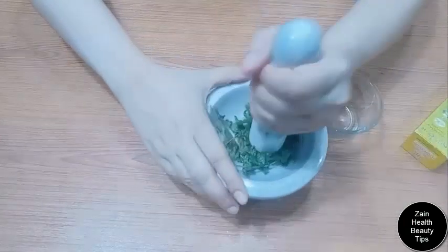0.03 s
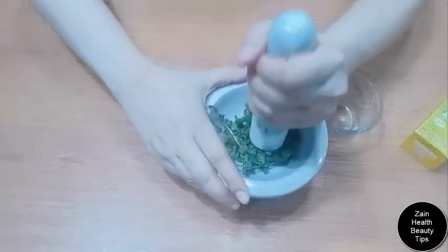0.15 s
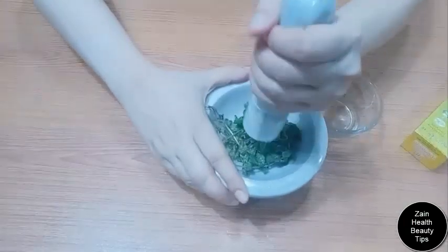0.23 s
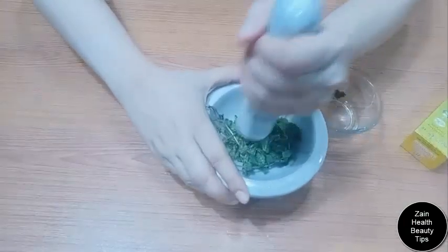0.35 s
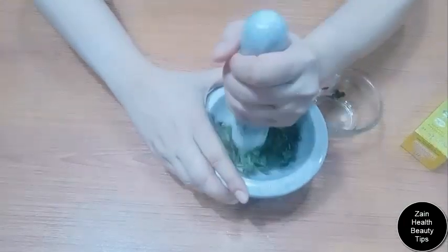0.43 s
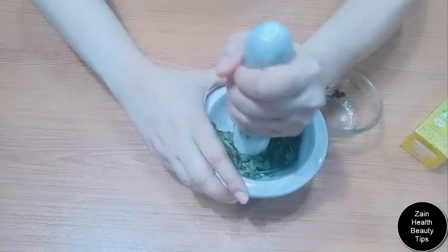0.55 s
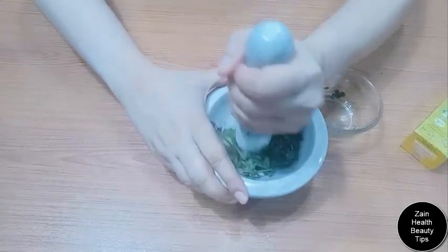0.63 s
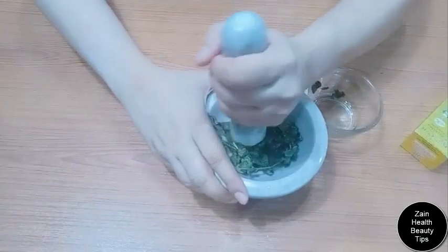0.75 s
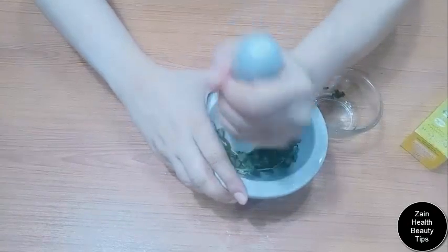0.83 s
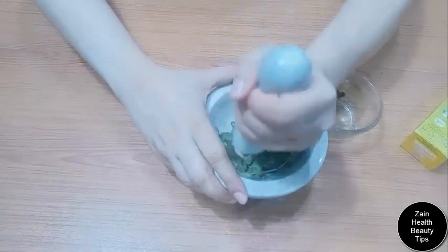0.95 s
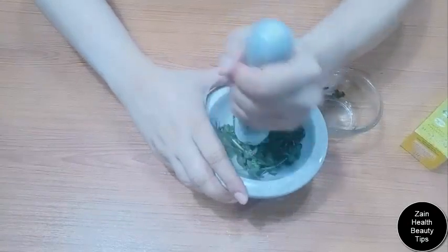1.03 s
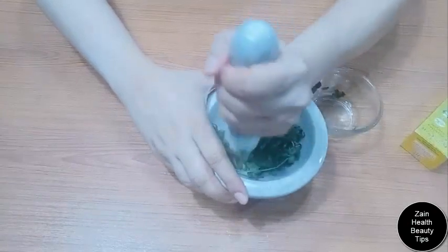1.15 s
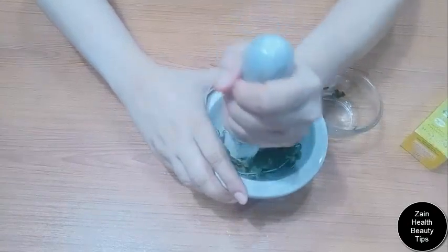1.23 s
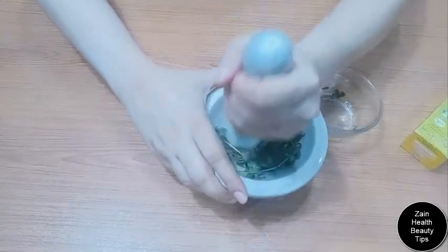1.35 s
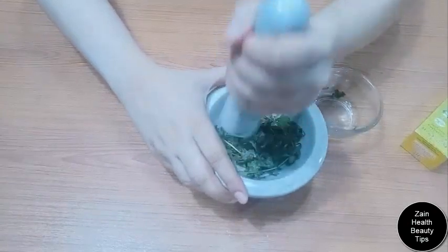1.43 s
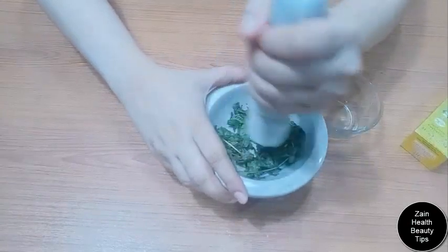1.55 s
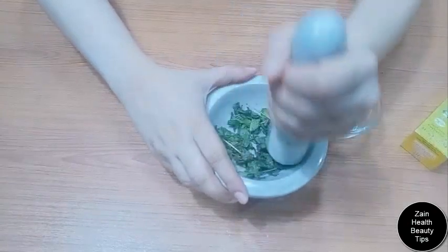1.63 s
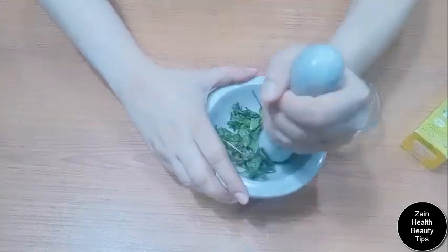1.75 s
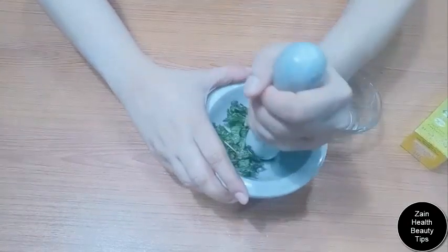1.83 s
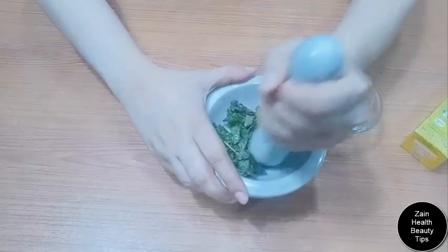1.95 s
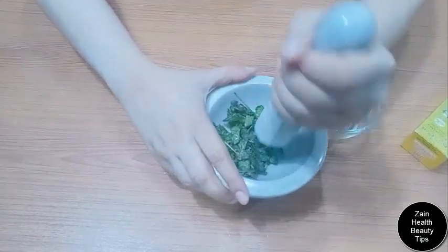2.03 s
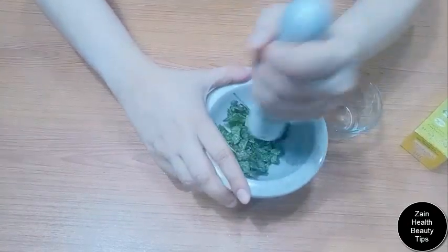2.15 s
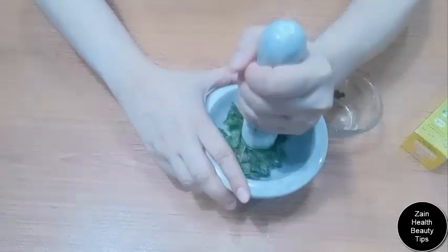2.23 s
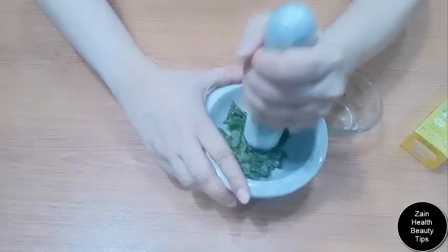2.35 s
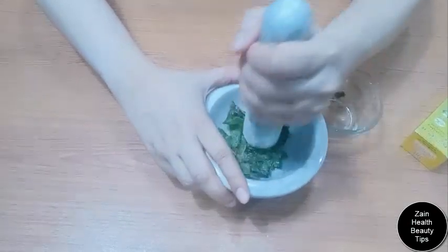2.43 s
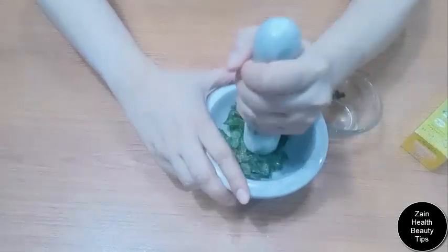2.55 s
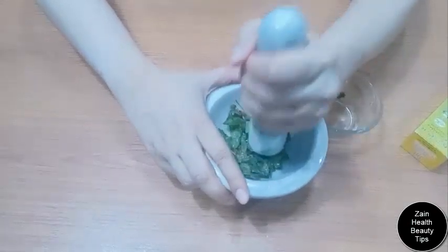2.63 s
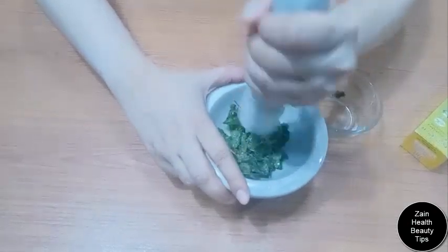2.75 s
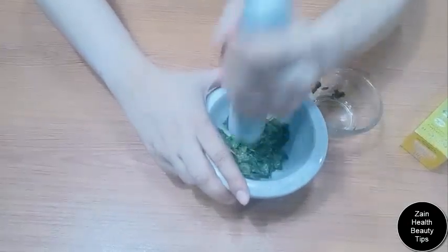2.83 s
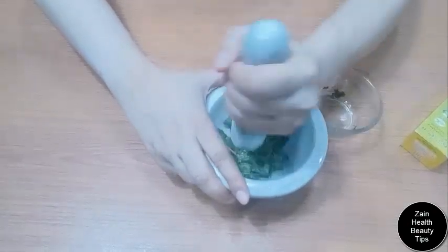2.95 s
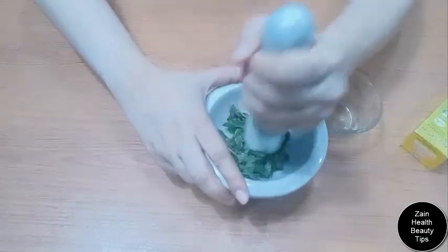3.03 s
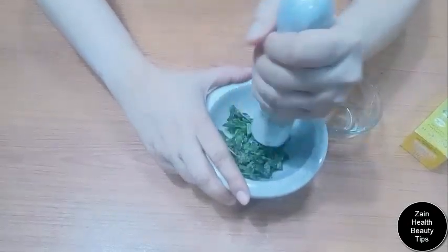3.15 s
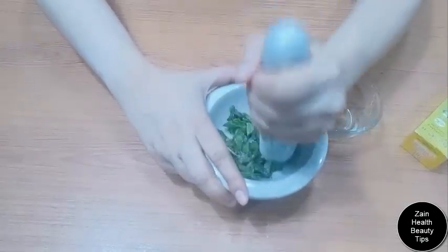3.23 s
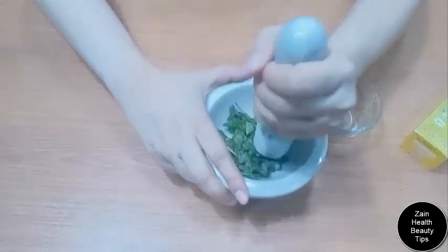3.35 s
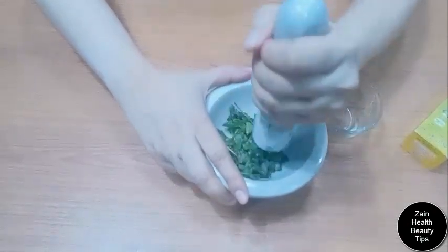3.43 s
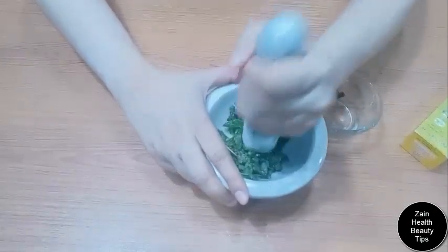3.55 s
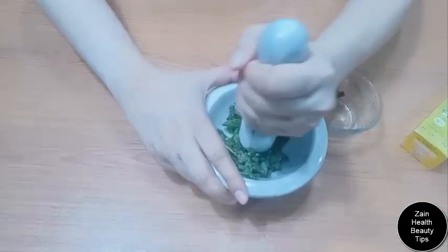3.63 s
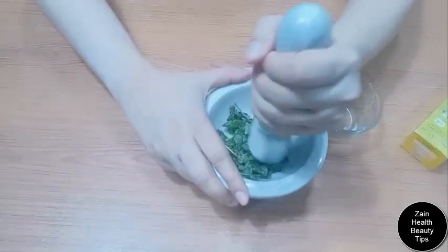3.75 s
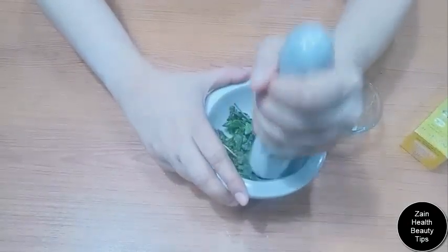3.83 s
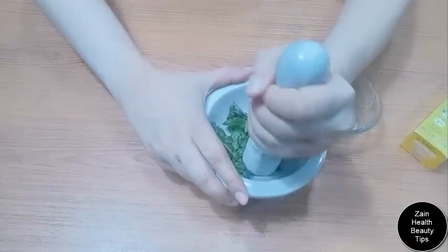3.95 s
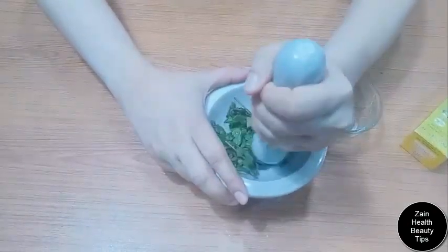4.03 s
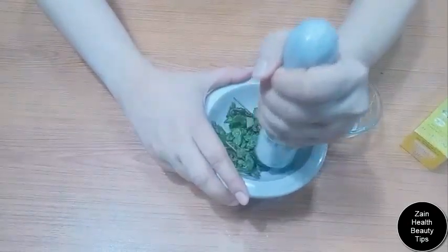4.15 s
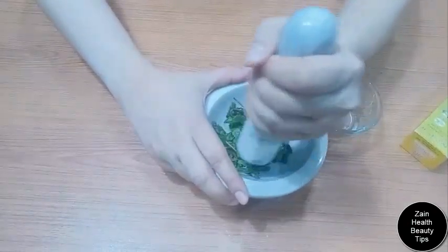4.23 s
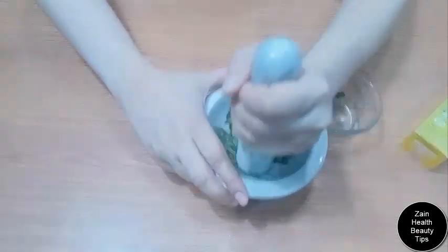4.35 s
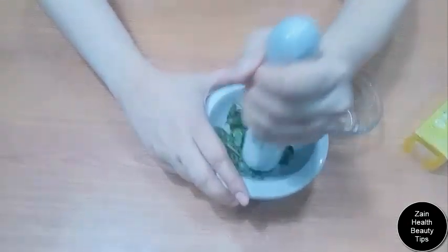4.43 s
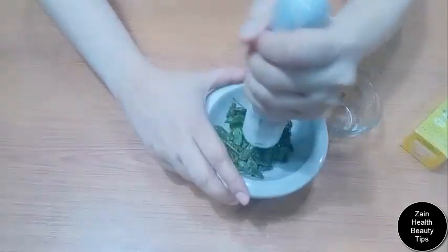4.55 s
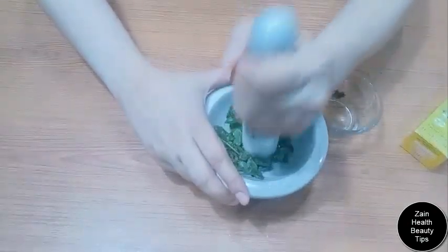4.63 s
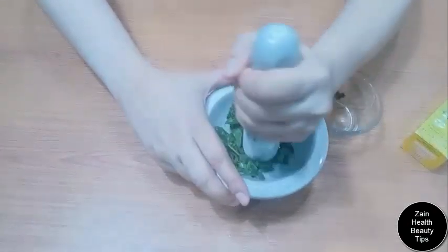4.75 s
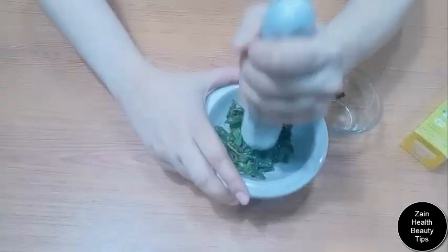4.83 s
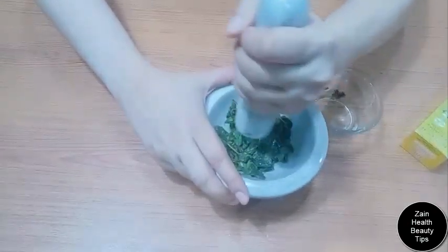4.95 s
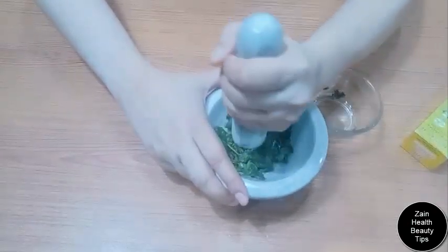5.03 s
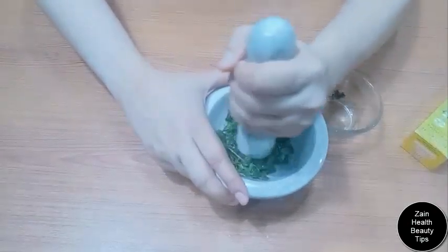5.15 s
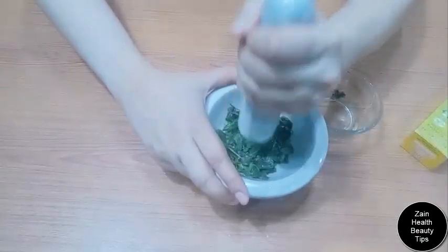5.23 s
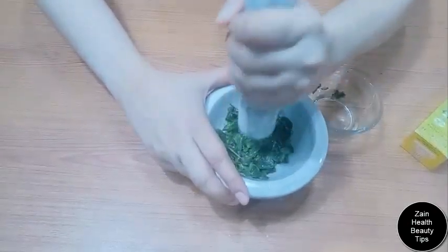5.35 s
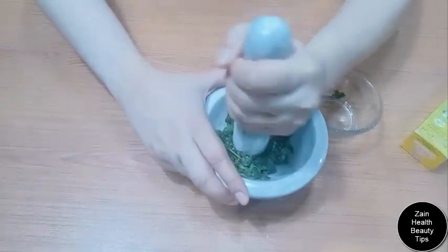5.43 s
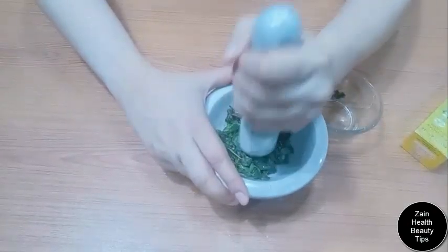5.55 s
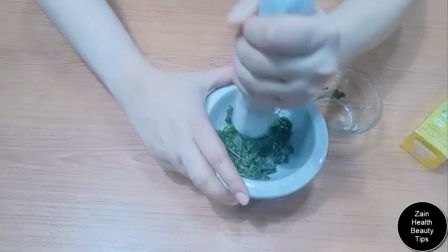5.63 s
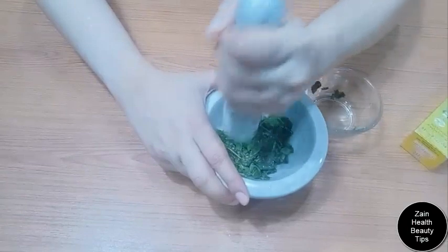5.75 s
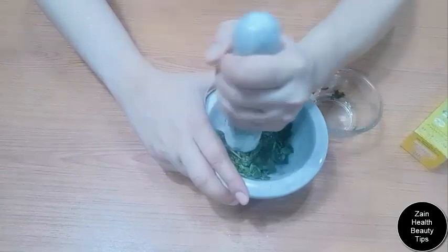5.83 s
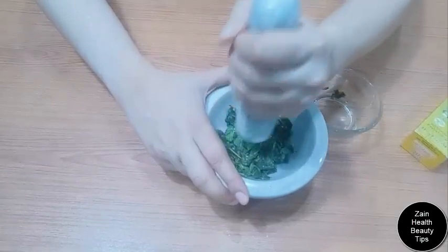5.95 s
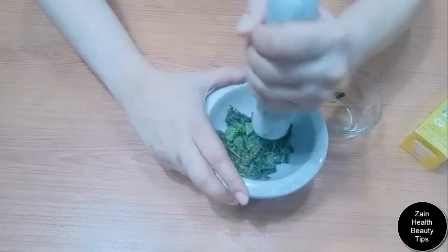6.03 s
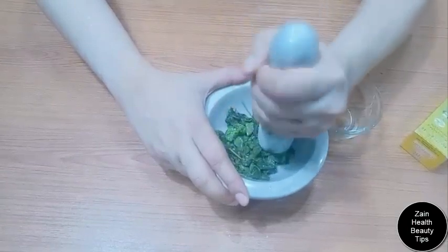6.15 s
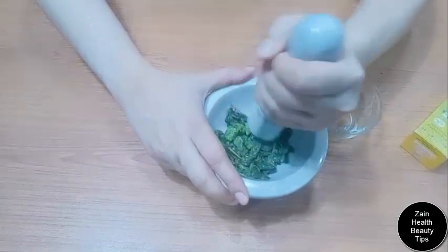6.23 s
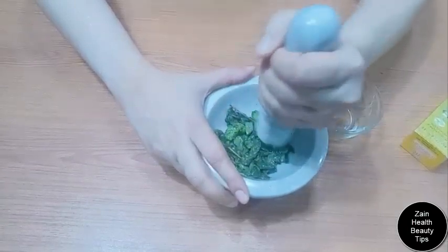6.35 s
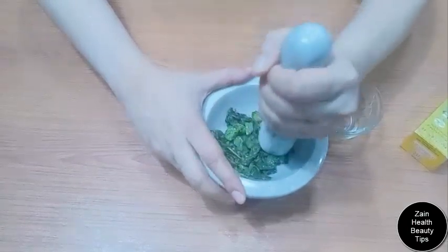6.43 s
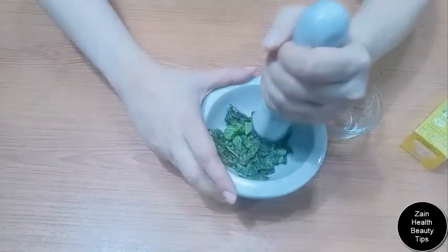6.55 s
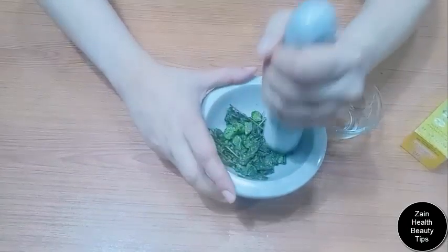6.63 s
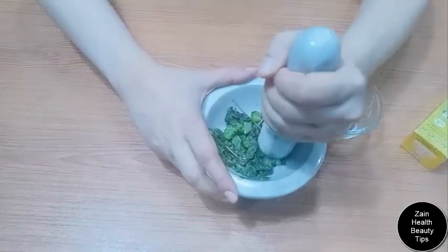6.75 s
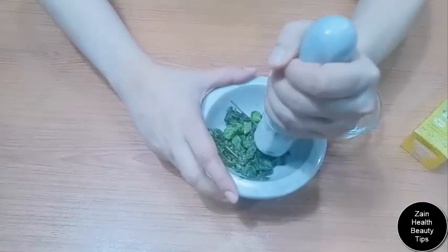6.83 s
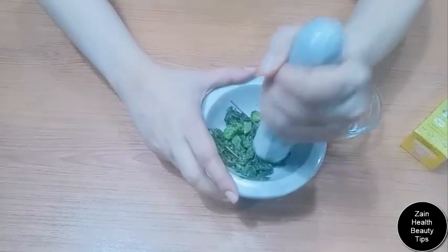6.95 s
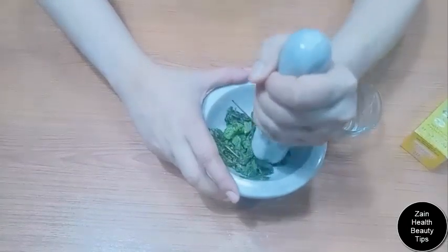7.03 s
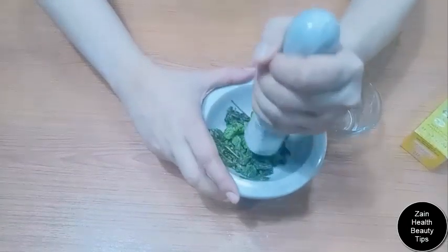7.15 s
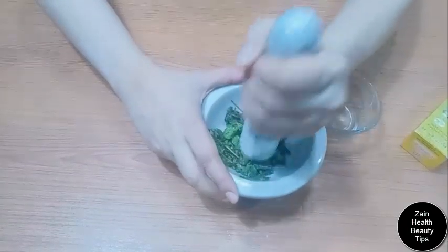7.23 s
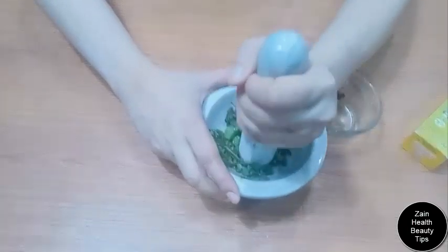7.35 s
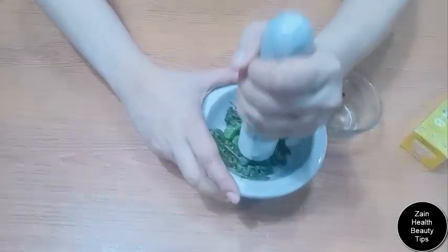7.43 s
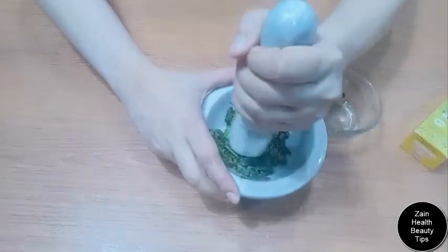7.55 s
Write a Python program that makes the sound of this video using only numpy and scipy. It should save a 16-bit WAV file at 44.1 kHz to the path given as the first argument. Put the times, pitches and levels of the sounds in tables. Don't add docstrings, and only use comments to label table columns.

```python
import sys
import numpy as np
from scipy import signal
from scipy.fft import rfft, irfft, next_fast_len
from scipy.io import wavfile
from scipy.ndimage import uniform_filter1d

SR = 44100
rng = np.random.default_rng(int(sys.argv[2]) if len(sys.argv) > 2 else 0)


def undo_db(level):
    steps = np.asarray(level, float) / 20
    return 10 ** steps


def persist_wave(psi):
    counts = np.round(np.clip(psi, -1, 1) * 32767).astype(np.int16)
    wavfile.write(sys.argv[1], SR, np.atleast_2d(counts).T)


N = 334353

# (time [s], peak [dB], crunch pitch [Hz], wet squash re peak [dB], spray toward walls [dB])
CRUSHED_LEAVES = [(0.0618, -14, 5350, -11, -15.5), (0.3571, -37, 4940, -18, -17),
                  (0.39, -6, 5380, -15.5, -17.5), (1.6637, -46.5, 6000, -1.5, -23),
                  (2.206, -15, 4960, -10.5, -14.5), (2.5115, -3, 5600, -14.5, -11.5),
                  (2.9045, -10, 5160, -14, -13.5), (3.2402, 3, 5810, -19, -11),
                  (3.5586, -8.5, 5070, -14, -11.5), (3.8426, -8.5, 6070, -8, -21),
                  (3.894, -14.5, 5850, -15.5, -24), (4.338, -16, 5340, -5.5, -16.5),
                  (4.6781, -5, 6000, -17, -14.5), (5.017, -15.5, 4770, -8, -13),
                  (5.4158, -22, 4900, -6.5, -16), (5.7894, -21.5, 4770, -8, -13),
                  (6.1424, -8, 4890, -13.5, -11.5), (6.4023, -5.5, 5350, -18.5, -14.5),
                  (6.6777, -2.5, 5960, -1.5, -17), (6.984, -8.5, 5500, -11.5, -9),
                  (7.043, -42.5, 5500, -16, -38), (7.0607, -20.5, 4912, -6.5, -21),
                  (7.2967, -13, 6080, -8, -16), (7.3031, -15.5, 5700, -10.5, -8)]
# (first crest [s], peak [dB], spot struck, + low mode, - high mode [dB], foot slap re peak [dB])
TABLE_PUSHES = [(0.0829, -20.5, 6.5, -4), (0.3932, -11, -2, -9), (1.667, -18, -10, -5),
                (1.68, -15, -21, -5.5), (2.2100, -14.5, 2, -4.5), (2.5146, -7, -1, -8.5),
                (2.9087, -7.5, -7, -11), (3.2452, -9, -1, -4.5), (3.562, -9.5, 1, -5),
                (3.8419, -16.5, 6, 0.5), (3.8531, -31, 20, 0), (4.3511, -9, -3.5, -7), (4.683, -19, -17, 5),
                (4.6936, -12.5, 5, -16), (5.0208, -6, -1, -9), (5.4233, -10, -8, -10),
                (5.795, -10.5, -6, -10), (6.1480, -18, 1, -8), (6.1645, -19, -3.5, -38),
                (6.4072, -11, 3.5, -6.5), (6.6778, -9, -7.5, -6), (6.6885, -14, 2, 6), (6.99, -8, 7, -3.5),
                (7.304, -23, -11, 8.5), (7.317, -11.5, 10, -6.5)]
# (time [s], peak [dB], knock pitch [Hz], bowl ring re peak [dB], spray toward walls [dB])
STONE_KNOCKS = [
    (1.6639, 0.6, 1885, -0.5, -2.5),
    (1.6778, -7, 1894, -26, -30),
    (3.842, 1.7, 1920, -18, -34),
    (3.8543, -8, 1890, -26, -40),
    (3.8597, -16, 1953, -19.5, -36.5),
    (3.8629, -12, 1950, -26, -38),
    (6.6787, 2.5, 2200, -11.5, -34),
    (6.6899, -4.1, 2146, -28, -12.5),
    (6.698, -9.5, 2200, -30, -23),
]
# (frequency [Hz], level [dB], t60 [s])
TABLE_MODES = [(99.7, -12.5, 0.4), (155, -6, 0.16), (178.6, -0.5, 0.4), (200.6, 2.3, 0.084),
               (246.7, -1.45, 0.1), (320.3, -7.5, 0.067), (351.4, -7, 0.16), (377, -24.5, 0.2)]


def colour(x, points):
    hz, db = np.transpose(points)
    grid_hz = np.arange(1, 2050) * SR / 4096
    log_gain = np.interp(np.log(grid_hz), np.log(hz), db) * np.log(10) / 20
    ceps = irfft(log_gain)
    ceps[1:2048] *= 2
    ceps[2049:] = 0
    impulse = irfft(np.exp(rfft(ceps)))
    return signal.fftconvolve(x, impulse[None], axes=1)[:, :x.shape[1]]


def band(x, hz, width_hz):
    return signal.lfilter(*signal.iirpeak(hz, hz / width_hz, SR), x)


def band_twice(x, hz, width_hz):
    return band(band(x, hz, width_hz), hz, width_hz)


def ring(modes, extra_db, length_s):
    t = np.arange(int(length_s * SR)) / SR
    hz, db, t60_s = np.transpose(modes)[:, :, None]
    decay = 1000. ** (-t / t60_s)
    return np.sum(undo_db(db + np.c_[extra_db]) * np.sin(2 * np.pi * hz * t) * decay, axis=0)


def swells(rows, rise_share):
    t, out = np.arange(0, N, 64) / SR, 0
    for s, db, length_s in rows:
        away = np.where(t < s, (s - t) / rise_share, t - s)
        out = out + undo_db(db - 20 * away / length_s)
    return np.interp(np.arange(N) / SR, t, out)


def add(track, s, sound, db, pan_db=0.):
    k = int(s * SR)
    sound = sound[:N - k] * undo_db(db) / np.abs(sound).max()
    track[:, k:k + len(sound)] += sound * undo_db(np.c_[[pan_db, -pan_db]] / 2)


def hum():
    # (frequency [Hz], density [dB per Hz])
    hum_spectrum = [(20, 11), (60, -11), (100, -4.5), (140, -2.5), (230, 5), (320, -8), (600, -13.5),
                    (900, -16.5), (1400, -26.5), (2300, -15.5), (3800, -23), (5500, -27.5), (7500, -39),
                    (11000, -56)]
    mid, side = colour(rng.standard_normal((2, N)), hum_spectrum)
    side = side - band(side, 170, 600)
    return (mid + side * [[1], [-1]]) / mid.std() * undo_db(-52)


def kitchen(x):
    # (frequency [Hz], level [dB], t60 [s], likeness of sides [0-1])
    wall_bands = [(78, -12.5, 0.89, 0.91), (150, -3.5, 0.37, 1), (357, -2, 0.49, 0.84), (1000, -1, 0.32, 0),
                  (2200, -6.5, 0.48, 0), (3870, -1, 0.44, 0), (6000, -3.5, 0.28, 0),
                  (8000, -12.5, 0.44, 0.01)]
    # (delay [s], left [dB], right [dB])
    near_walls = [(0.0115, -11.5, -22), (0.015, -24.5, -11), (0.019, -16, -13.5), (0.023, -24, -24.5)]
    level_db, gap_s, rise_s = -29.5, 0.0051, 0.0077
    turns_per_s = .77
    t = np.arange(int(.9 * SR)) / SR
    centres_hz = 45 * 2 ** np.arange(0, 8.2, .5)
    hz, *columns = np.transpose(wall_bands)
    by_band = [np.interp(np.log(centres_hz), np.log(hz), c) for c in columns]
    near = np.zeros((2, len(t)))
    for s, *db in near_walls:
        near[:, int(s * SR)] = undo_db(np.array(db))
    x = x.mean(axis=0, keepdims=True)
    turn, out = 2 * np.pi * turns_per_s * np.arange(N) / SR, 0
    for share in (np.cos(turn), np.sin(turn)):
        echo = 0
        for f, db, t60_s, alike in zip(centres_hz, *by_band):
            mid, side = band(rng.standard_normal((2, len(t))), f, f / 3.55)
            alike = np.clip(alike, 0, 1)
            pair = np.sqrt(1 + alike) * mid + np.sqrt(1 - alike) * side * [[1], [-1]]
            echo = echo + undo_db(db) * 1000. ** (-t / t60_s) * pair
        echo *= np.clip((t - gap_s) / rise_s, 0, 1) * undo_db(level_db)
        out = out + signal.fftconvolve(x * share, echo, axes=1)[:, :N]
    return out + signal.fftconvolve(x, near, axes=1)[:, :N]


def sideways():
    stone_db, slap_db, top_db, top_per_db, decay_s = 1, -12.5, -21, 0.1, .0004
    # (centre [Hz], width [Hz])
    bright, stone, slap, top = (5845, 4400), (2200, 1200), (1000, 1430), (10200, 1600)
    bursts = [(s, db + slap_db, slap) for s, db, *_ in TABLE_PUSHES]
    bursts += [(s, spray_db, stone) for s, *_, spray_db in STONE_KNOCKS]
    for s, db, _, squash_db, spray_db in CRUSHED_LEAVES:
        bursts.append((s, spray_db, bright))
        bursts.append((s, db + squash_db + stone_db, stone))
        bursts.append((s, top_db + top_per_db * db, top))
    out, t = np.zeros((2, N)), np.arange(1200) / SR
    noise = rng.standard_normal((len(bursts), len(t))) * np.exp(-t / decay_s)
    for (s, db, (hz, width_hz)), row in zip(bursts, noise):
        add(out, s, band_twice(row, hz, width_hz), db + 3.5)
    return out


def stirring():
    # (loudest [s], level [dB], length [s])
    rustles = [(0.45, -42.5, 0.07), (0.665, -47.5, 0.1), (0.775, -46, 0.034), (0.9, -53, 0.22),
               (1.025, -46.5, 0.04), (1.125, -42.5, 0.048), (1.175, -49, 0.036), (1.32, -47, 0.061),
               (1.545, -77, 0.038), (1.83, -49.5, 0.11), (1.94, -52.5, 0.044), (2.6, -48.5, 0.11),
               (4.0, -46.5, 0.12), (4.656, -60, 0.0043), (4.95, -61, .1), (5.77, -47.5, .015),
               (6.102, -59, 0.0072), (1.06, -59, .006), (4.15, -54.5, .006), (7.075, -56.5, 0.03),
               (7.24, -54, 0.023), (7.53, -50, 0.065)]
    # (loudest [s], level [dB], length [s])
    shifts = [
        (0.62, -80, 0.072),
        (0.78, -59, 0.091),
        (1.02, -59, .04),
        (1.14, -57.5, .15),
        (1.3, -73, .2),
        (1.55, -61.5, 0.12),
        (2.42, -62.5, 0.059),
        (2.85, -52.5, 0.064),
        (6.33, -49.5, 0.091),
        (7.5, -37, 0.28),
    ]
    rise_share = 0.89
    sink = [(s - .003, 0.6 * db - 58, .003) for s, db, *_ in CRUSHED_LEAVES]
    settle = [(s + 0.11, db - 28, 0.17) for s, db, *_ in TABLE_PUSHES]
    bursts_db = 1.6 * np.repeat(rng.exponential(size=N // 90 + 1), 90)[:N]
    snaps = rng.standard_normal((2, N)) * undo_db(bursts_db)
    rustle = band_twice(snaps, 5600, 2600)
    rustle = rustle + .38 * band_twice(snaps, 2300, 1800) + .33 * band(snaps, 8300, 4000)
    rub = rng.standard_normal(N)
    rumble = sum(undo_db(db) * band(rub, hz, 59) for hz, db, _ in TABLE_MODES)
    rumble = rumble + undo_db(-13.0) * band(rub, 520, 740)
    leaf_swell = swells(rustles, rise_share) + swells(sink, .04 / 0.0018)
    foot_swell = swells(shifts + settle, rise_share)
    leaves = rustle / rustle.std() * leaf_swell * undo_db(5.5)
    return leaves + rumble / rumble.std() * foot_swell * undo_db(-9.0)


def scrapes():
    # (start [s], length [s], pitch [Hz], level [dB rms])
    drags = [(1.03, 0.49, 900, -64.5), (1.276, 0.24, 960, -66.5), (1.508, 0.053, 1120, -68),
             (4.633, 0.081, 1230, -53.5), (4.919, 0.15, 1220, -54.5), (5.163, 0.09, 1230, -53.5),
             (5.33, 0.1, 1224, -53), (5.324, 0.094, 580, -53.5), (5.533, 0.12, 1010, -61.5),
             (6.053, 0.12, 624, -56.5), (6.222, 0.19, 904, -53), (6.48, 0.2, 1000, -52.5),
             (7.19, 0.078, 1000, -48), (7.216, 0.059, 2950, -50.5), (7.412, 0.52, 1170, -46.5),
             (7.481, 0.22, 890, -56), (7.498, 0.08, 2940, -46.5), (7.037, 0.074, 3320, -45),
             (5.192, 0.071, 2720, -58.5)]
    out = np.zeros((2, N))
    for s, length_s, hz, db in drags:
        rub = band_twice(rng.standard_normal(SR // 2), hz, hz / 5)
        rub = rub[4000:4000 + int(length_s * SR)]
        catch = uniform_filter1d(np.repeat(rng.standard_normal(60), 400), size=200)
        rub = rub * undo_db(3 * catch[:len(rub)])
        add(out, s, rub * np.sqrt(np.hanning(len(rub))), db + 9.0)
    return out


def thuds():
    # (frequency [Hz], level [dB], t60 [s])
    foot_modes = [(566.0, 13.0, 0.0091), (712, 4.5, 0.019), (1068, 6.5, 0.0066), (1430, 4.0, 0.0033)]
    scatter_db = 2
    out = np.zeros((2, N))
    push = np.hanning(int(0.0032 * SR))
    bend = ring([(210.2, 8.3, 0.025)], [0], .6)
    highpass = signal.butter(2, 82, "high", fs=SR)
    chance = rng.standard_normal((len(TABLE_PUSHES), 2 * len(TABLE_MODES)))
    for (s, db, spot_db, slap_db), c in zip(TABLE_PUSHES, chance):
        modes = np.array(TABLE_MODES) * np.c_[1 + .02 * c[:8], np.ones((8, 2))]
        drive_db = np.r_[0, spot_db - 3, -6, -spot_db, 0, 0, 0, 0] + scatter_db * c[8:]
        sound = np.convolve(bend + ring(modes, drive_db, .6), push)
        sound = signal.lfilter(*highpass, sound)
        add(out, s - np.argmax(sound[:200]) / SR, sound, db)
        add(out, s + .007, ring(foot_modes, 3 * c[:4], 0.058), db + slap_db)
    return out


def clacks():
    # (frequency [Hz], level [dB], t60 [s])
    bowl_modes = [(6230, 0, .1), (6120, -7, .07), (6400, -10, .05), (10120, -5, .07), (9800, -11, .05),
                  (5600, -9, .02)]
    cycles, edge_db, pan_db = 3.4, -11, 1
    out, bowl = np.zeros((2, 2, N))
    for s, db, hz, ring_db, _ in STONE_KNOCKS:
        length = cycles / hz * SR
        t = (np.arange(int(length)) - length / 2) / SR
        add(out, s + t[0], np.hanning(len(t)) * np.sin(2 * np.pi * hz * t), db - 0.5, pan_db)
        add(out, s, np.array([1., -2, 1]), db + edge_db, pan_db)
        add(bowl, s, ring(bowl_modes, np.zeros(len(bowl_modes)), .25), db + ring_db)
    return out, bowl


def crunches():
    swell_ms, pan_db = 3.92, 1.5
    out, t = np.zeros((2, N)), np.arange(1500) / SR
    noise = rng.standard_normal((len(CRUSHED_LEAVES), 3, len(t)))
    u = t * 2000 / swell_ms
    swell = u ** 2 * np.exp(-2 * u)
    for (s, db, hz, squash_db, _), (a, b, c) in zip(CRUSHED_LEAVES, noise):
        fold = band(c[:200] * np.linspace(.3, 1, num=200), hz, 5000)
        bright = band_twice(a * swell, hz, 1800)
        top = band(band(c * swell, 9400, 3100), 9400, 3300)
        squash = band(band(b * swell, 2376, 1600), 2100, 1600)
        add(out, s - .004, fold, db - 18, pan_db)
        add(out, s - .0008, bright, db + 1.2, pan_db)
        add(out, s - .0008, top, db - 3.0, pan_db)
        add(out, s - .0008, squash, db + squash_db, pan_db)
    return out


def scene():
    # (frequency [Hz], gain [dB])
    mic_response = [(25, -11), (100, -2.45), (1200, 5), (2300, 1.5), (3000, 1.5), (3800, -4.5),
                    (4600, -5.5), (5300, -3.5), (6500, -5), (7800, -7), (9500, -10), (11000, -13),
                    (16000, -51)]
    # (frequency [Hz], phase by which left leads [rad])
    port_phase = [(0, 0), (600, 0.0), (1030, 0.2), (1810, 1.8), (2840, -0.4), (5170, -0.4), (5860, 0.7),
                  (6800, 5.0), (7150, 3.1), (8530, 3.0), (9300, 4.8), (9910, 3.1), (10300, 3.4),
                  (10800, 1.6)]
    knocks, bowl = clacks()
    body = thuds() + stirring() + scrapes() + bowl
    add(body, 0, ring(TABLE_MODES, [-15, -25, 22, -19, -19.0, -20, -16, 55], .5), -30)
    head_on = crunches() + knocks
    near = body + head_on
    size = next_fast_len(N)
    lead_rad = np.interp(np.fft.rfftfreq(size, 1 / SR), *np.transpose(port_phase))
    right = irfft(rfft(near[1], size) * np.exp(-1j * lead_rad), size)[:N]
    direct = np.array([near[0], right])
    echoed = kitchen(body + sideways() + undo_db(-10.5) * head_on)
    return colour(direct + echoed, mic_response) + hum()


def roll_off(x):
    return signal.sosfilt(signal.butter(12, 11180, fs=SR, output="sos"), x)


def record(dry):
    headroom = 1.12
    return roll_off(np.clip(dry, -headroom, headroom))


dry = scene()
out = record(dry)
persist_wave(out)
```